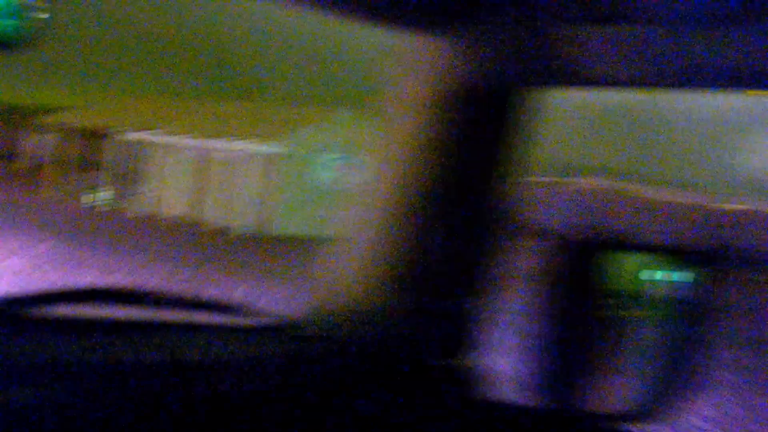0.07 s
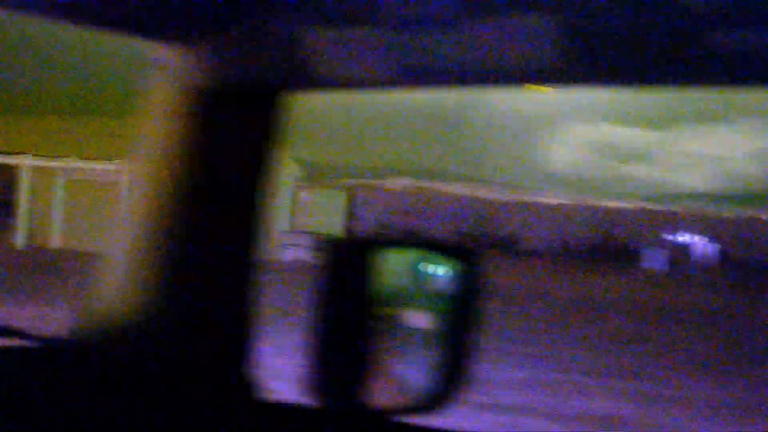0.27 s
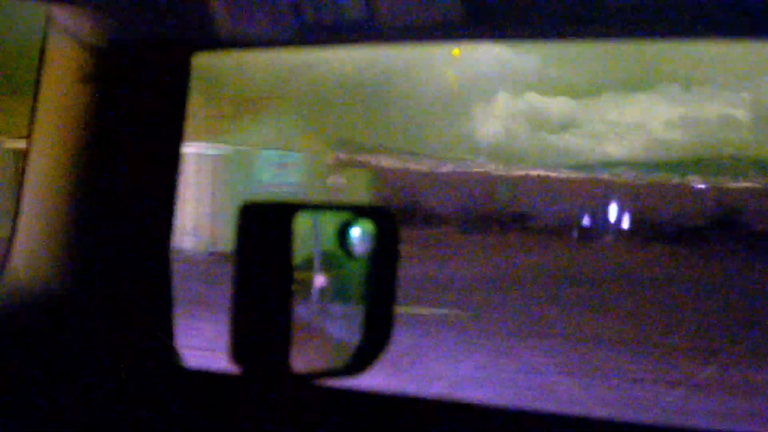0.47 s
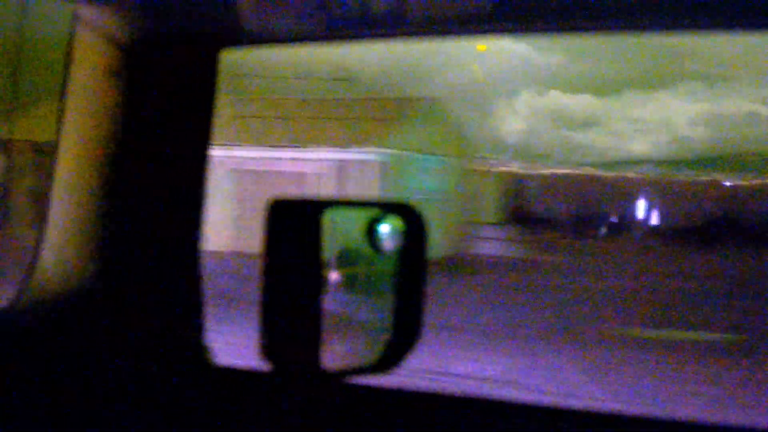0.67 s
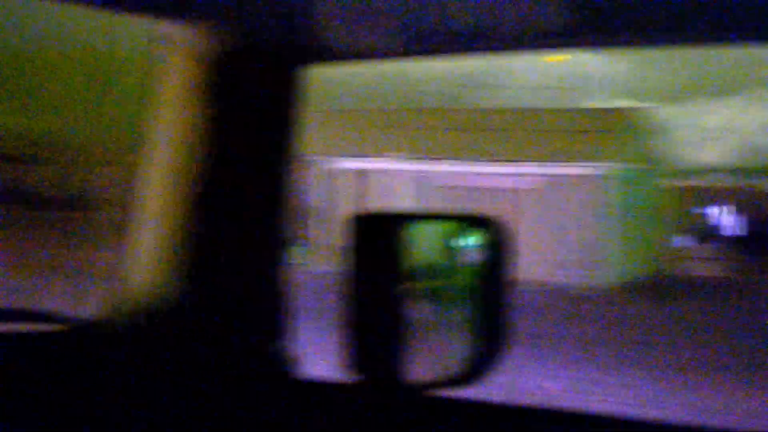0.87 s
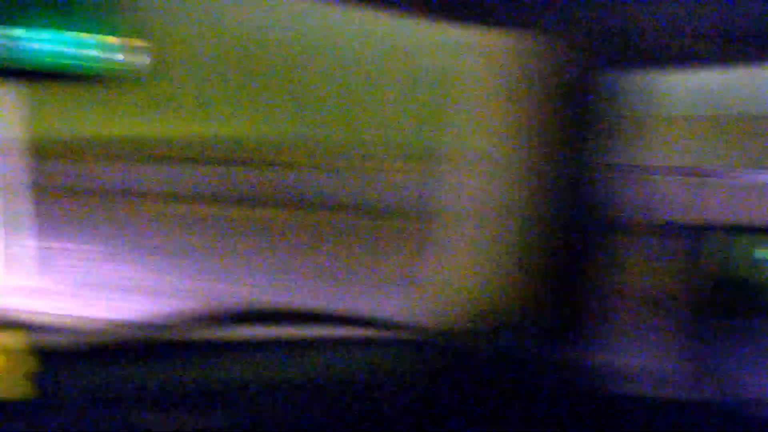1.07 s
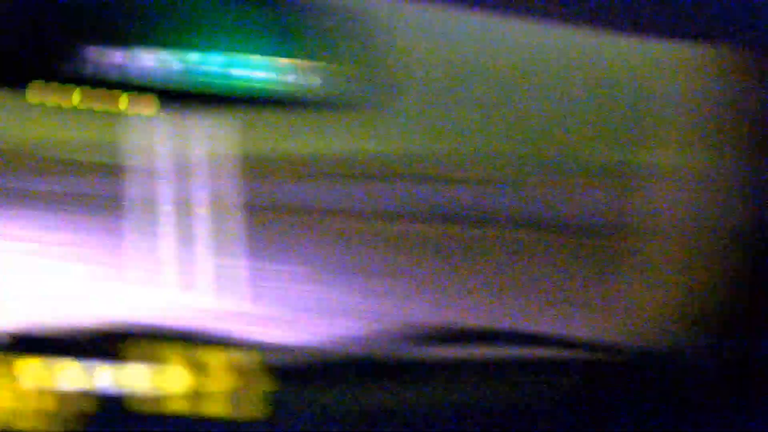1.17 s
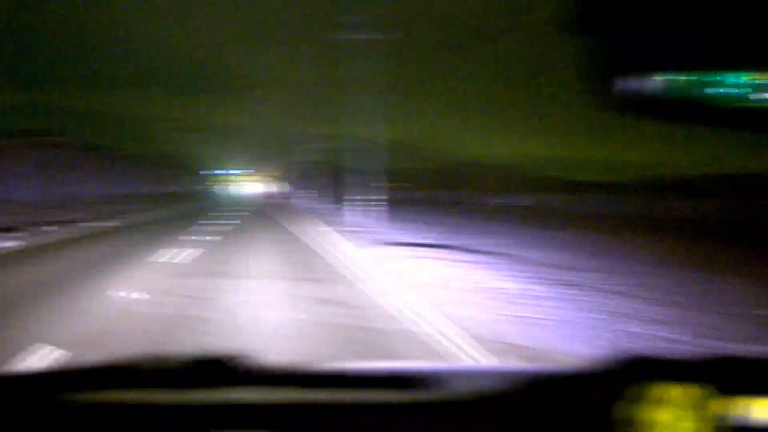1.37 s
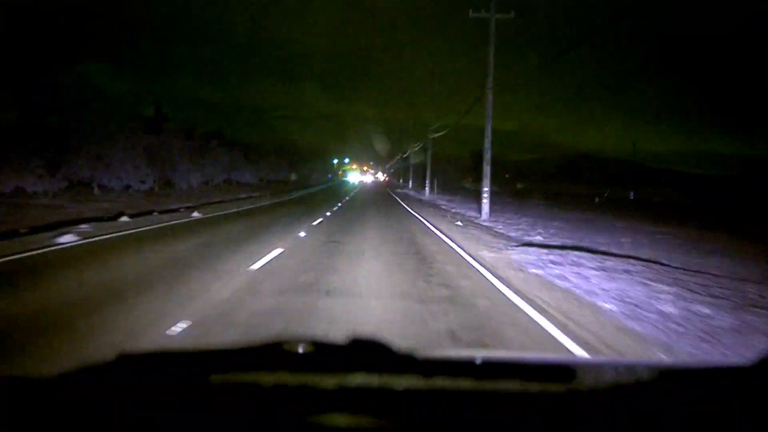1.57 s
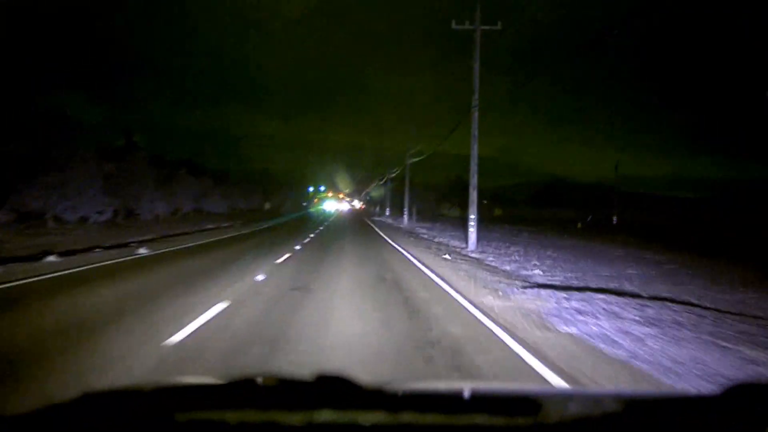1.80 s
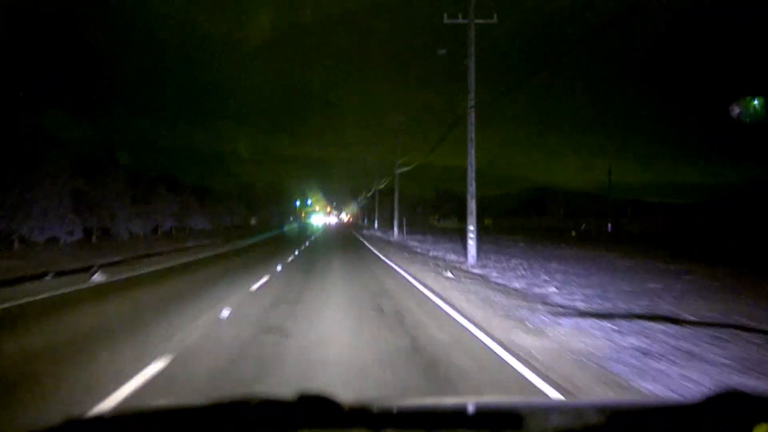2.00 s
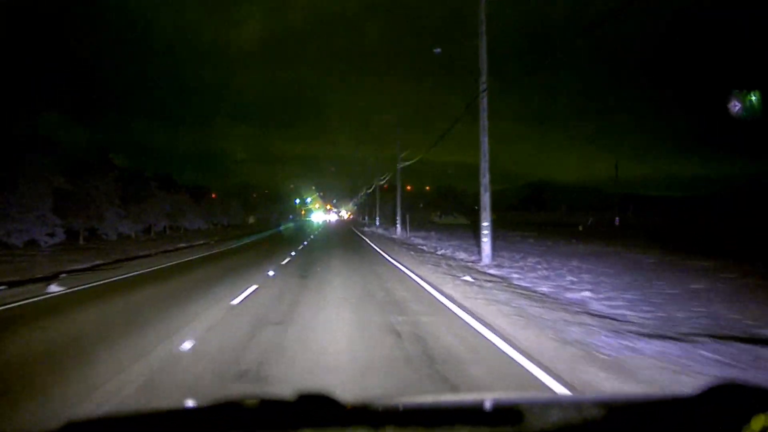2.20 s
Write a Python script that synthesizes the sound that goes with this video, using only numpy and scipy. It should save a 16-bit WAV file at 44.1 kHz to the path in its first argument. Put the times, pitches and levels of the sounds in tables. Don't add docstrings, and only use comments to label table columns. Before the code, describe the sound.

A car engine drones low and steady inside the cabin at road speed, swelling and thinning slightly, over floor rumble, soft bumps and faint wind hiss, captured by a small, dull handheld microphone.

```python
import sys
import numpy as np
from scipy import signal
from scipy.io import wavfile
from scipy.ndimage import uniform_filter1d

SR = 44100
rng = np.random.default_rng(int(sys.argv[2]) if len(sys.argv) > 2 else 0)


def volts_from_decibels(level):
    exponent = np.asarray(level, float) / 20
    return 10 ** exponent


def file_out(sig):
    cols = np.atleast_2d(sig).T
    lim = np.clip(cols, -1, 1)
    pcm = np.round(lim * 32767).astype(np.int16)
    wavfile.write(sys.argv[1], SR, pcm)


N = 98916


def evened(x):
    return x / np.sqrt(np.mean(x ** 2) + 1e-20)


def curve(table, column):
    rows = np.array(table, float)
    return np.interp(np.arange(N) / SR, rows[:, 0], rows[:, column])


def drift(top_hz):
    t = np.arange(N) / SR
    return evened(sum(np.sin(2 * np.pi * (f * t + rng.random())) / np.sqrt(f)
                      for f in np.geomspace(.4, top_hz, 16)))


def noise(colour, patchy_db, flicker_db, size):
    frames = 4 * N // size + 5
    hz = np.fft.rfftfreq(size, 1 / SR)
    real, imag, patches = rng.standard_normal((frames, len(hz), 3)).T
    patches = uniform_filter1d(patches, size=9, axis=0)
    patches = evened(uniform_filter1d(patches, size=9, axis=1))
    flicker = rng.standard_normal(frames)
    f, level = np.transpose(colour)
    colour_db = np.interp(np.log(hz + 1), np.log(f + 1), level, left=-150, right=-150)
    gain = volts_from_decibels(colour_db[:, None] + patchy_db * patches + flicker_db * flicker)
    spectra = (real + 1j * imag) * gain
    return evened(signal.istft(spectra, nperseg=size, noverlap=3 * size // 4)[1][:N])


def resonate(x, hz, width_hz):
    turn = np.exp(2j * np.pi * np.cumsum(hz) / SR)
    r = np.exp(-np.pi * width_hz / SR)
    return 2 * (turn * signal.lfilter([1 - r], [1, -r], x / turn)).real


def ring(hz, width_hz):
    hz = hz * np.ones(N)
    once = resonate(rng.standard_normal(N), hz, width_hz)
    return evened(resonate(once, hz, width_hz))


def engine():
    # (time [s], rate [Hz])
    firing = [(0, 64.5), (1.0, 64.45), (1.22, 63.9), (1.4, 64.35), (1.7, 64.6), (2.24, 64.55)]
    # (time [s], twice firing rate [dB], firing rate [dB])
    boom = [(0, -30.5, -31), (.25, -27, -26.5), (.55, -30, -32), (.7, -33, -29), (.95, -33.5, -34),
            (1.2, -35.5, -28), (1.3, -31.5, -43), (1.42, -27, -33), (1.62, -26, -28.5), (1.72, -26, -27),
            (1.81, -25.5, -35), (1.97, -27, -26.5), (2.24, -24.5, -27.5)]
    # (multiple of firing rate [ratio], level [dB rms])
    minor = [(.5, -39), (.75, -34), (1.5, -42), (2.5, -51), (3, -54.5)]
    waver_db = 1.41
    turns = np.cumsum(curve(firing, 1)) / SR
    orders = [(2, curve(boom, 1)), (1, curve(boom, 2)), *minor]
    drone = 0
    for multiple, db in orders:
        tone = np.sin(2 * np.pi * (multiple * turns + rng.random()))
        drone = drone + np.sqrt(2) * volts_from_decibels(db + waver_db * drift(12)) * tone
    return drone


def rumble():
    # (frequency [Hz], level [dB per Hz])
    colour = [(5, -11), (14, 6), (30, 1), (40, -5), (50, -7.5), (60, -7), (75, -26.5)]
    return volts_from_decibels(-36) * noise(colour, patchy_db=0.83, flicker_db=0.65, size=8192)


def bumps():
    # (time [s], level [dB], body pitch [Hz], length [s])
    hits = [(.027, -16.5, 40, 0.017), (0.029, -21, 16.2, 0.075), (0.178, -27, 49, 0.089),
            (0.281, -23.5, 41, 0.061), (0.48, -20.5, 15, 0.026), (0.596, -26, 18, 0.032),
            (0.769, -21.5, 45, 0.087), (0.872, -32, 50, 0.11), (1.031, -20.5, 26, 0.027),
            (1.097, -25, 50, 0.059), (1.204, -20, 35.2, 0.048), (1.373, -19.5, 45.5, 0.036),
            (1.548, -26.5, 48, 0.06), (1.698, -26, 22, 0.043), (1.841, -23, 24, .07),
            (1.851, -28.5, 34, 0.042), (2.064, -20.5, 46.2, 0.08), (2.127, -22, 26, 0.032),
            (2.214, -25.5, 51, 0.094)]
    t = np.arange(N) / SR
    rocks = np.zeros(N)
    for start, db, hz, length in hits:
        swell = np.exp(-((t - start) / length) ** 2)
        sway = np.sin(2 * np.pi * (hz * (t - start) + rng.random()))
        rocks += np.sqrt(2) * volts_from_decibels(db) * swell * sway
    return rocks


def roar():
    # (frequency [Hz], level [dB per Hz])
    colour = [(45, -10), (75, 2), (105, 0), (145, -7.5), (380, -13), (620, -20.5), (900, -23.5),
              (2300, -46.5)]
    return volts_from_decibels(-31.5 + .4 * drift(2.7)) * noise(colour, patchy_db=0.69, flicker_db=0.37, size=2048)


def panels():
    # (time [s], door level [dB], dash level [dB])
    view = [
        (0, -54, -50.5),
        (.35, -45, -56),
        (.7, -42.5, -53),
        (1.0, -48, -62),
        (1.5, -60.5, -49),
        (1.85, -55, -43),
        (2.24, -58.5, -39),
    ]
    door = volts_from_decibels(curve(view, 1)) * ring(hz=268.6, width_hz=87)
    dash = volts_from_decibels(curve(view, 2)) * ring(hz=200, width_hz=44)
    return door + dash


def tyres():
    # (time [s], pitch [Hz], level [dB])
    song = [(0, 760, -54), (.2, 735, -50), (.35, 745, -50), (.55, 745, -53), (.75, 722, -47.5),
            (.9, 735, -52), (1.08, 725, -47.5), (1.35, 725, -49.5), (1.55, 750, -48), (1.7, 815, -50),
            (1.85, 805, -52), (1.97, 745, -51), (2.08, 800, -51), (2.24, 810, -48)]
    hz = curve(song, 1) * (1 + .012 * drift(25))
    return volts_from_decibels(curve(song, 2) + 1.1 * drift(12)) * ring(hz, width_hz=58)


def wind():
    # (time [s], level [dB])
    gusts = [(0.02, -50), (0.03, -48), (0.16, -51.5), (0.23, -47.5), (0.25, -52), (0.36, -49),
             (0.63, -51.5), (2.15, -51), (2.2, -51)]
    # (frequency [Hz], level [dB per Hz])
    colour = [(710, -34.5), (1200, -6.5), (1670, -8), (2340, -7.5), (2550, -9), (3920, -4.5), (4800, -20),
              (6240, -48), (10600, -120)]
    return volts_from_decibels(curve(gusts, 1) + 0.5) * noise(colour, patchy_db=1., flicker_db=0.93, size=512)


def flutters():
    # (time [s], level [dB], length [s], pitch [Hz])
    puffs = [
        (.225, -56, .015, 3900),
        (.33, -53, .2, 3750),
        (.336, -52, .004, 3600),
        (1.15, -60, .012, 4100),
        (1.57, -61, .005, 5100),
    ]
    t = np.arange(N) / SR
    return sum(volts_from_decibels(db) * np.exp(-((t - start) / length) ** 2) * ring(hz, width_hz=740)
               for start, db, length, hz in puffs)


def self_noise():
    # (frequency [Hz], level [dB per Hz])
    colour = [(3500, -31), (4700, -4), (5400, -3), (7200, -3.5), (7800, -7.5), (8300, -19.5), (8900, -37.5),
              (15000, -44.5)]
    return volts_from_decibels(-67) * noise(colour, patchy_db=0.87, flicker_db=0.36, size=512)


def scene():
    car = engine() + rumble() + bumps() + roar() + panels() + tyres()
    return (car + wind() + flutters())[None]


def top_cut(x):
    return signal.sosfilt(signal.butter(12, 21800, fs=SR, output="sos"), x)


def record(dry):
    taps = signal.firwin(255, 7800, window=("kaiser", 8), fs=SR)
    padded = np.pad(dry, ((0, 0), (127, 127)), "edge")
    band = signal.oaconvolve(padded, taps[None], "valid")
    return top_cut(band + self_noise())


dry = scene()
out = record(dry)
file_out(out)
```